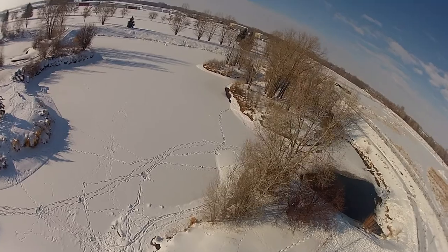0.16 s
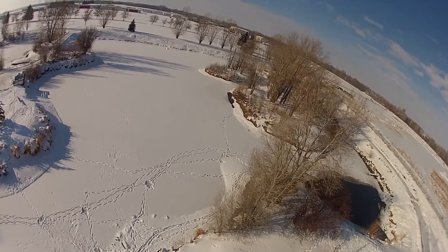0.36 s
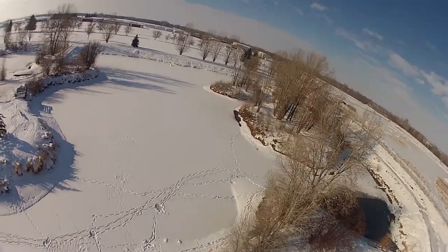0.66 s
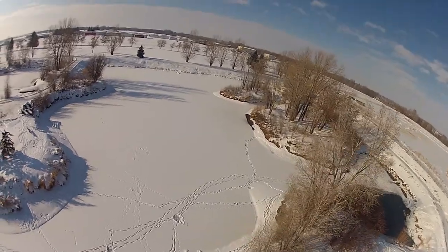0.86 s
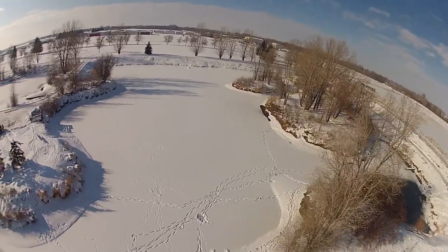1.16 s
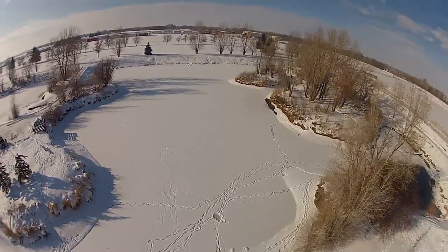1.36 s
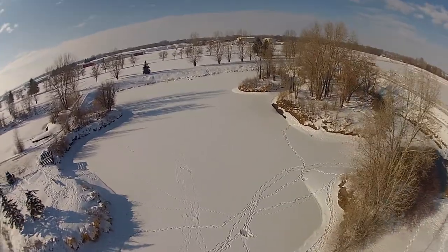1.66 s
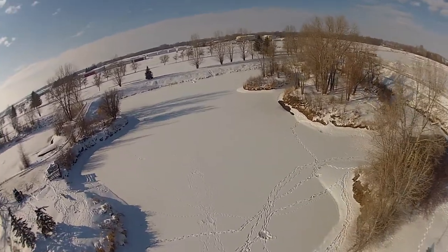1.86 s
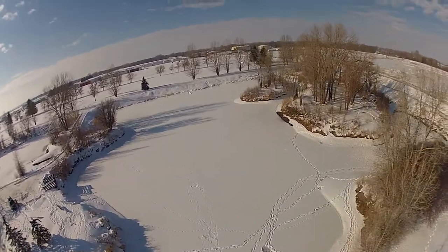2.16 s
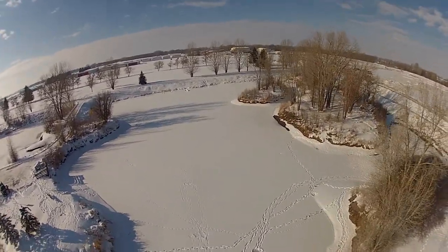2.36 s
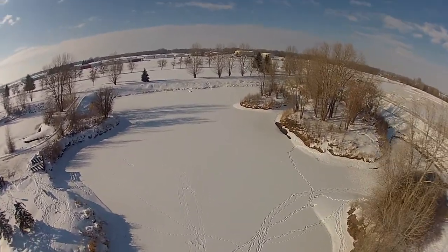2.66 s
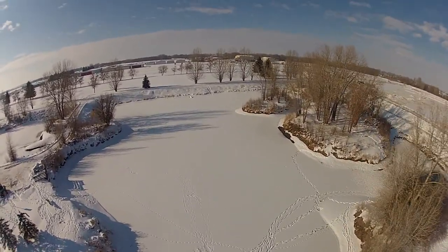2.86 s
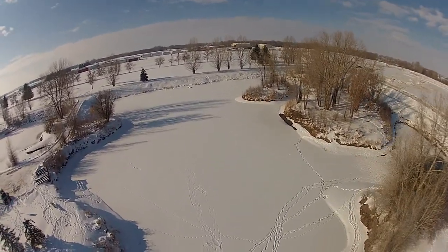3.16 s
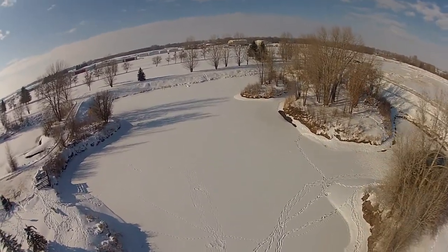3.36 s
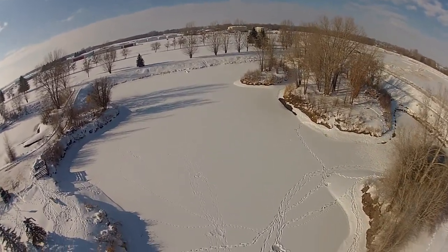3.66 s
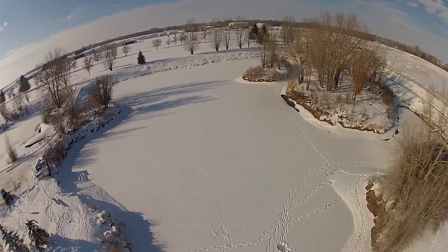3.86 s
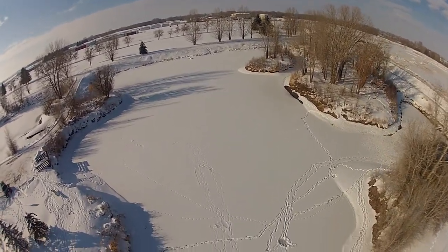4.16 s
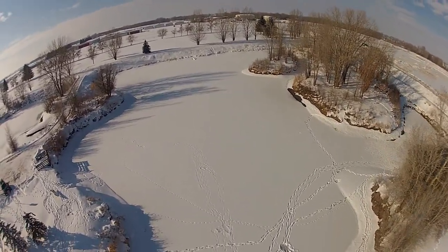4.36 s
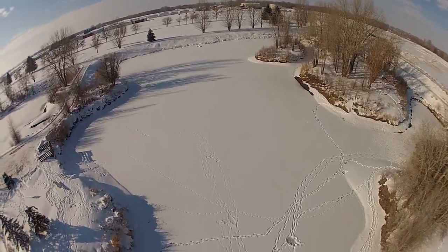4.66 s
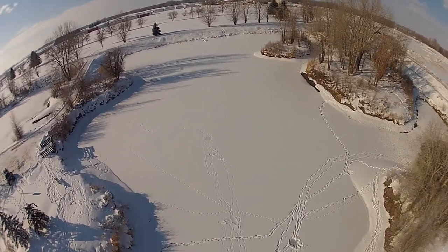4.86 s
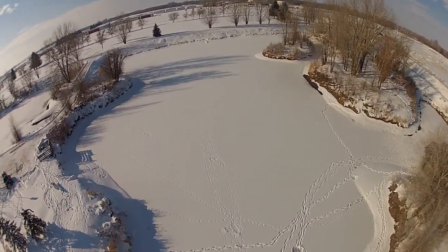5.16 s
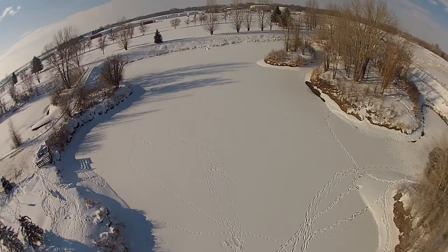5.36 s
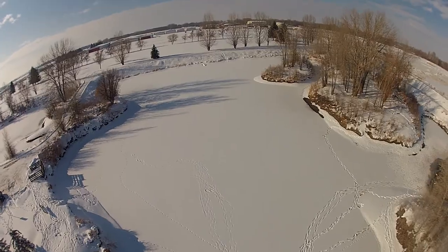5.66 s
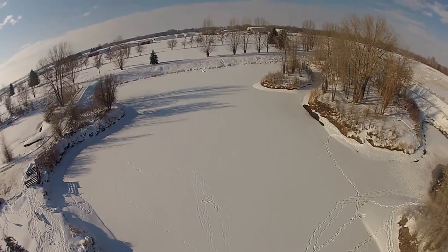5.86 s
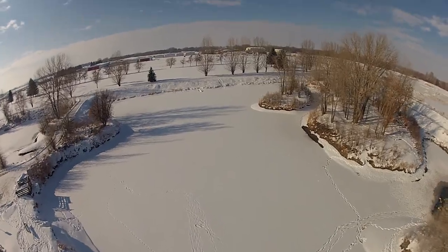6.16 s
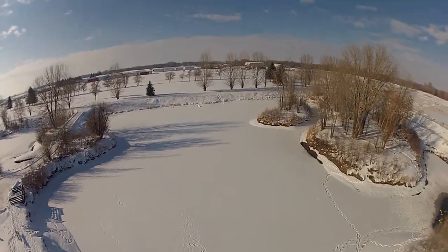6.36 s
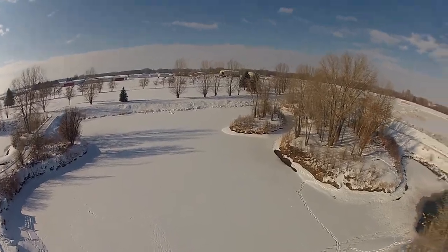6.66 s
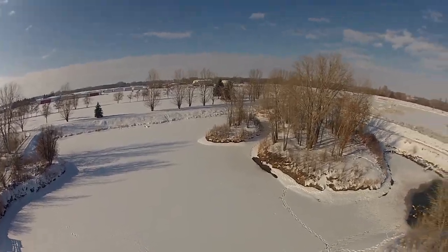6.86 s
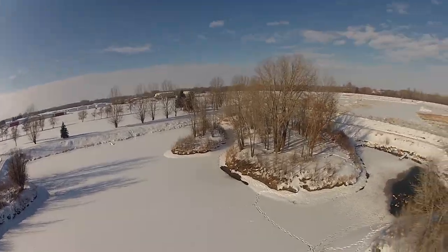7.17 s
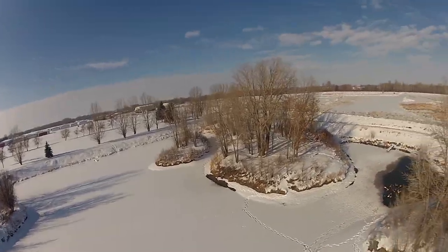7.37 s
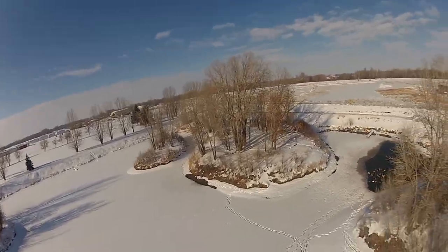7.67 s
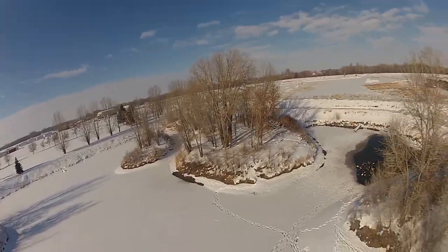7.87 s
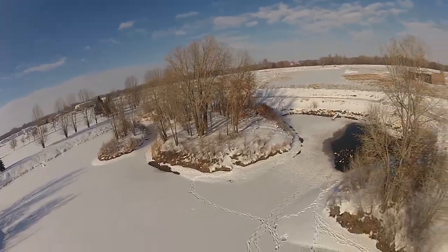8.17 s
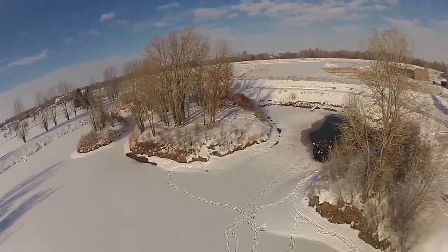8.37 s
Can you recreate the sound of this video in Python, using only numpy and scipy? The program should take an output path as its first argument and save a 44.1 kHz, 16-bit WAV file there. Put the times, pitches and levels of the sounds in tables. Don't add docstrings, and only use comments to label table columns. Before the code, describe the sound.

Low wavering propeller buzz and harsh airy hiss of a drone in flight, with wind roar and heavy thumps early, then again near the end.

```python
import sys
import numpy as np
from scipy import signal
from scipy.fft import rfft, irfft
from scipy.io import wavfile
from scipy.ndimage import uniform_filter1d, map_coordinates

SR = 44100
rng = np.random.default_rng(int(sys.argv[2]) if len(sys.argv) > 2 else 0)


def transcribe(signal):
    frames = np.atleast_2d(signal).T
    limited = np.clip(frames, -1, 1)
    pcm = np.round(limited * 32767).astype(np.int16)
    wavfile.write(sys.argv[1], SR, pcm)


def ratio_of_db(decibels):
    return 10 ** (np.asarray(decibels, float) / 20)


N = 375732

# (time [s], blade passing rate [Hz], blade hiss level [dB])
THROTTLE = [(0, 173, -44.5), (.15, 175, -39.5), (.32, 160, -40.5), (.85, 160, -34.5), (1.1, 168, -36.5),
            (1.5, 183, -36.5), (1.66, 159.9, -37), (2.45, 178, -33), (3.0, 170, -39), (3.3, 160, -39),
            (3.9, 155, -37.5), (4.5, 159, -34), (4.85, 155, -33.5), (5.2, 167, -33.5), (6.2, 167, -31.5),
            (6.55, 164, -30), (7.6, 161, -35), (8.1, 151, -36.5)]


def unit(x):
    return x / np.sqrt(np.mean(x ** 2) + 1e-20)


def curve(s, value):
    return np.interp(np.arange(N) / SR, s, value)


def wobble(rate):
    knots = rng.standard_normal(int(N * rate / SR) + 4)
    return map_coordinates(knots, [np.arange(N) * rate / SR])


def after(s):
    return np.arange(N) / SR - np.reshape(s, (-1, 1))


def noise(spectrum, lo_hz, hi_hz, patchy_db):
    z = signal.stft(rng.standard_normal(N + 512), nperseg=512)[2]
    across_pitch = uniform_filter1d(rng.standard_normal(z.shape), 5, 0)
    patches = unit(uniform_filter1d(across_pitch, 10, 1))
    white = signal.istft(z * ratio_of_db(patchy_db * patches), nperseg=512)[1][:N]
    hz = np.fft.rfftfreq(N, 1 / SR)
    f, db = np.transpose(spectrum)
    shaped = rfft(white) * ratio_of_db(np.interp(np.log(hz + 1), np.log(f + 1), db, right=-120))
    in_band = irfft(shaped * (hz > lo_hz) * (hz < hi_hz), N)
    return irfft(shaped, N) / np.std(in_band)


def duck_db():
    # (time [s], depth [dB])
    ducks = [
        (.76, 8),
        (.915, 8.5),
        (1.28, 2),
        (1.725, 6.5),
        (2.523, 7.5),
        (3.62, 3.5),
        (7.85, 8.5),
        (7.959, 12),
    ]
    at, depth_db = np.transpose(ducks)
    t = after(at)
    attack = np.clip(t / 0.0027, 0, 1)
    recover_db_per_s = 43
    return -np.sum(attack * np.maximum(depth_db[:, None] - recover_db_per_s * np.abs(t), 0), axis=0)


def blade_hiss_db():
    # (time [s], rise [dB])
    blips = [
        (0, 3.6),
        (.09, 4.3),
        (1.16, 1.9),
        (1.44, 1.9),
        (2.44, 2.6),
        (4.74, 0.85),
        (5.13, 1.9),
        (6.55, 2.9),
        (7.95, 7.3),
    ]
    s, _, db = np.transpose(THROTTLE)
    at, rise_db = np.transpose(blips)
    blip_s = 0.031
    return curve(s, db) + duck_db() + rise_db @ np.exp(-(after(at) / blip_s) ** 2)


def shafts():
    # (time in step [s], level [dB], time out of step [s], dip [dB])
    beat_table = [(.131, -12.5, .304, -8), (.343, -16, .374, -7), (.518, -15, .627, -16),
                  (.743, -10, .9, -20), (1.25, -12, 1.55, -6), (1.661, -13.5, 1.78, -18),
                  (2.1, -14, 2.33, -12), (2.469, -14, 2.535, -14), (2.668, -11, 2.738, -24),
                  (2.917, -13, 3.058, -9), (3.295, -15, 3.433, -11), (3.56, -14, 3.67, -16),
                  (3.915, -14.5, 4.018, -14), (4.134, -14, 4.288, -20), (4.548, -12.3, 4.665, -14),
                  (4.772, -13, 4.882, -24), (5.029, -13.6, 5.12, -10), (5.197, -10, 5.33, -20),
                  (5.389, -10.3, 5.436, -11), (5.6, -10.5, 5.671, -17), (5.72, -12, 5.903, -13),
                  (5.955, -10.7, 6.046, -20), (6.156, -9.4, 6.213, -24), (6.265, -9.3, 6.366, -19),
                  (6.491, -10, 6.615, -12), (6.672, -11, 7.061, -15), (7.114, -12, 7.295, -11),
                  (7.487, -12.5, 7.747, -8), (7.815, -13, 8.0, -12), (8.47, -15.5, 8.56, -16)]
    # (time [s], depth [dB])
    crossings = [(.068, 18), (.578, 0), (1.05, 8), (1.152, 16), (1.375, 5), (1.495, -4), (2.03, 6),
                 (2.264, 2), (2.797, 10), (2.995, 6), (3.51, 15), (3.62, 16), (3.781, 7), (4.422, 21.5),
                 (4.489, 16), (4.962, 2.5), (5.246, 10.5), (5.535, 10), (5.807, 10), (6.125, 10),
                 (6.53, 13), (6.78, 10), (6.933, 1), (7.199, 5), (7.4, 3.5), (7.532, 7.5), (7.87, 13),
                 (8.136, 12), (8.233, 18), (8.335, 15.5)]
    s, db, s_dip, dip_db = np.transpose(beat_table)
    beats = curve(np.ravel([s, s_dip], "F"), np.arange(2 * len(s)) / 2)
    slip = np.pi / 2 * uniform_filter1d(beats, size=SR // 50)

    blade_hz = curve(*np.transpose(THROTTLE)[:2]) * (1 + 0.006 * wobble(8))
    sag_hz = 10
    blade_hz += sag_hz * uniform_filter1d(.5 - (beats + .5) % 1, size=SR // 30)
    shaft_step = np.pi * blade_hz / SR

    lead = curve(s_dip, ratio_of_db(np.minimum(dip_db, 0)))
    pull = 2 * lead / (1 + lead ** 2)
    mean = np.cumsum(shaft_step - pull * np.gradient(slip))
    far = [np.cumsum(shaft_step * (1 + 0.01202 * wobble(4) + offset)) for offset in (-.022, .018)]

    at, depth_db = np.transpose(crossings)
    half_length_s = 0.022
    cancelled_db = depth_db @ np.exp(-(after(at) / half_length_s) ** 2)
    tone_db = curve(s, db) + 0.74 * duck_db() - cancelled_db
    return [mean + slip, mean - slip, *far], (1 + lead) / 2, tone_db


def blade_tone(angle, share, tone_db):
    near = share * np.cos(2 * angle[0]) + (1 - share) * np.cos(2 * angle[1])
    far = np.cos(2 * angle[2]) + np.cos(2 * angle[3])
    far_db = uniform_filter1d(tone_db, size=SR // 4) - 13
    return ratio_of_db(tone_db + 2.8) * near + ratio_of_db(far_db) * far


def shaft_overtones(angle, hiss_db):
    # (multiple of shaft speed [-], level [dB])
    orders = [(1, -7.5), (2, 0), (3, -14), (4, -13), (5, -18), (6, -21), (7, -26), (8, -34.5), (9, -41)]
    nearness_db = [-0.5, -2, 2, -0.5]
    loading_db = -17 + 1.01 * (hiss_db - hiss_db.mean())
    total = np.zeros(N)
    for order, db in orders:
        if order == 2:
            continue
        thrust_db = (-22 + 0.42 * duck_db() if order % 2 else loading_db) - 4.5
        for a, near_db in zip(angle, nearness_db):
            level = ratio_of_db(thrust_db + db + near_db + 2.3 * wobble(5))
            total += level * np.cos(order * (a + 6 * rng.random()))
    return total


def blade_hiss(angle, hiss_db):
    # (frequency [Hz], density [dB per Hz])
    hiss_spectrum = [(410, -59), (700, -8), (881, -11.5), (1060, -4.5), (1270, -8), (1490, -4),
                     (2550, -5.5), (2950, -8.5), (3430, -7.5), (3900, -17), (5070, -76), (8580, -120)]
    pulses_db = sum(1.1 * np.cos(2 * a) + 0.68 * np.cos(a) for a in angle)
    chop = ratio_of_db(pulses_db + 0.51 * wobble(40))
    level = ratio_of_db(hiss_db + 0.5 * wobble(12))
    return level * unit(chop) * noise(hiss_spectrum, 2123, 3200, patchy_db=0.5)


def frame_whine(hiss_db):
    phase = 2 * np.pi * 1590 * np.arange(N) / SR + 2.5 * wobble(6)
    return ratio_of_db(hiss_db - 28 + 1.3 * wobble(5.4)) * np.sin(phase)


def rotors():
    angle, share, tone_db = shafts()
    hiss_db = blade_hiss_db()
    hum = blade_tone(angle, share, tone_db) + shaft_overtones(angle, hiss_db)
    return hum + blade_hiss(angle, hiss_db) + frame_whine(hiss_db)


def wind():
    # (time [s], level [dB])
    buffeting = [(0.0, -37), (0.04, -48.5), (0.8, -23), (1.47, -29), (2.11, -23.5), (2.3, -23), (2.47, -16),
                 (2.54, -23.5), (3.28, -48), (3.44, -18.5), (3.56, -32.5), (7.12, -28.5), (7.14, -38),
                 (7.78, -18.5), (7.83, -18.5), (8.02, -20.5), (8.09, -20), (8.52, -32.5)]
    # (start [s], length [s], roar level [dB])
    gust_table = [(0, 0.0054, -24.5), (0.684, 0.014, -15), (0.73, .02, -16), (0.764, 0.15, -17.5),
                  (0.927, 0.3, -22.5), (1.289, 0.057, -18.5), (1.348, .05, -29), (1.455, 0.047, -26.5),
                  (1.67, 0.066, -19.5), (1.751, 0.44, -23.5), (2.235, 0.15, -22.5), (2.407, 0.093, -27.5),
                  (2.67, 0.043, -32), (2.75, 0.013, -23), (3.425, 0.051, -46), (5.11, 0.037, -31),
                  (5.593, .03, -33), (6.778, 0.054, -32.5), (7.15, 0.039, -28), (7.821, .02, -24),
                  (7.923, 0.033, -23), (7.99, .015, -29.5), (8.093, .03, -27), (8.192, 0.045, -28),
                  (8.343, .03, -31.5)]
    # (frequency [Hz], density [dB per Hz])
    buffet_spectrum = [(10, -34), (25, -9), (60, 2), (120, 2), (250, -6.5), (500, -24), (1000, -52)]
    roar_spectrum = [(60, -22), (150, 10.5), (280, 0), (520, -4.5), (900, -12), (1400, -25), (2500, -32),
                     (4000, -64)]
    rush_spectrum = [(60, -3), (150, -3), (280, -3.5), (520, -5.5), (900, -10.5), (1400, -19), (2500, -20),
                     (4000, -47)]

    buffet_db = curve(*np.transpose(buffeting)) + 3.4 * wobble(6) + 0.49 * duck_db()
    s, length, db = np.transpose(gust_table)
    t = after(s)
    edge_s = 0.029
    gusts = ratio_of_db(db) @ np.clip(np.minimum(t, length[:, None] - t) / edge_s + .5, 0, 1)
    slipstream = ratio_of_db(blade_hiss_db() - 0.5)
    roar_db = 20 * np.log10(gusts + slipstream) + 0.73 * wobble(18)

    eddies = 0.49 * wobble(45) + 1.0 * wobble(130)
    lumps_db = np.clip(0.11 * (roar_db + 39.5), .4, 2.2) * eddies
    buffet = ratio_of_db(buffet_db + 1.7 * lumps_db) * noise(buffet_spectrum, 23, 80.8, patchy_db=1.0)
    gusty = np.clip((roar_db + 34) / 8, 0, 1)
    roar = np.sqrt(gusty) * noise(roar_spectrum, 468, 1200, patchy_db=1)
    rush = np.sqrt(1 - gusty) * noise(rush_spectrum, 528, 1100, patchy_db=-1)
    return buffet + ratio_of_db(roar_db - 2.5 + lumps_db) * (roar + rush)


def thumps():
    # (time [s], pitch [Hz], peak level [dB], length [cycles])
    bursts = [(.689, 320, 8, 0.2), (.771, 320, -1, 0.4), (.812, 420, 14, 0.23), (.89, 423, 10, 0.54),
              (1.067, 237, -3, 0.57), (1.14, 420, -4, .73), (1.174, 317.5, -4, 0.96), (1.205, 316, 2, 0.8),
              (1.312, 235, -3, .94), (1.347, 320, -7, 0.56), (1.663, 241, -2.5, 1.1), (1.687, 320, -9, .43),
              (1.708, 560, 10.5, 0.66), (1.908, 238, -1, 0.35), (2.01, 420, 2.5, 0.88),
              (2.072, 320, -2, 0.4), (2.101, 420, -4, .54), (2.259, 420, -7, 0.73),
              (2.342, 242.1, -10, 0.46), (2.42, 237, 1.5, 0.77), (2.467, 700, -1, 0.36),
              (2.508, 312, 10, 0.93), (2.756, 240, -0.5, 1.4), (2.762, 560, 4, 1.7), (7.835, 240, 5, 1.1),
              (7.945, 977, 7, 1.6), (7.952, 322.6, 2.5, 1.4), (8.107, 320, -1, 0.3),
              (8.206, 235.5, -5, 0.78), (8.39, 237, -2, 1.1)]
    flutters = [(2.685, 446, -6.5, 1.9), (3.425, 297, -4, 1.1), (3.475, 250, -3.5, 1.1),
                (3.495, 328, -4, 1.5), (3.668, 332, -6.5, 2.9), (3.848, 301, -6, 0.84),
                (3.92, 243, -1.5, 1.2), (4.101, 258, -1, 0.57), (7.9445, 2600, -6, .6),
                (7.991, 565.9, -9, 1.4), (8.131, 250, -17, 0.51)]
    # (time [s], peak level [dB])
    snaps = [(.687, 0.5), (.731, -0.5), (0.775, 2), (.803, 6.5), (.846, -3), (.876, 3), (.902, 4.5),
             (1.024, -3), (1.179, 0), (1.317, -13), (1.758, 3), (1.786, 1.5), (2.505, 3.5), (7.831, -2),
             (8.102, -12)]
    booms = [(0.802, -12), (2.464, 7), (2.502, 5), (7.724, -2), (7.784, -4), (7.836, 9.5), (7.924, 1),
             (7.947, 8), (8.201, 5), (8.263, 0.5), (8.307, 5.5)]
    rows = bursts + flutters
    rows = rows + [(s, 805, db, 0.47) for s, db in snaps]
    rows = rows + [(s, 104, db, 0.62) for s, db in booms]

    half = SR // 25
    t = np.arange(-SR // 25, SR // 25) / SR
    out = np.zeros(N + SR)
    for (s, hz, db, cycles), turn in zip(rows, rng.random(len(rows))):
        envelope = np.exp(-2 * (t * hz / cycles) ** 2)
        wiggle = envelope * np.cos(2 * np.pi * (hz * t + turn))
        out[round(s * SR) - half:][:len(t)] += ratio_of_db(db - 5.5) * wiggle
    return out[:N]


def scene():
    return (rotors() + wind() + thumps())[None]


def band_limit(x):
    return signal.sosfilt(signal.butter(12, 15760, fs=SR, output="sos"), x)


def record(dry):
    clipped = dry / (1 + np.abs(dry / 1.02) ** 12) ** (1 / 12)
    camera_hz, player_hz = 8000, 32000
    slow = signal.resample(clipped, N * camera_hz // SR, axis=1)
    steps = np.repeat(slow, player_hz // camera_hz, axis=1)
    held = signal.resample(steps, N, axis=1)
    hz = np.fft.rfftfreq(N, 1 / SR)
    top_hz = 15300
    stop_db = np.maximum(-22 - .03 * (hz - top_hz), -34)
    edge_db = np.where(hz < top_hz, -1.5 * (hz > 14900), stop_db)
    mix = np.clip(irfft(rfft(held) * ratio_of_db(edge_db), N), -1, 1)
    return band_limit(mix)


dry = scene()
out = record(dry)
transcribe(out)
```